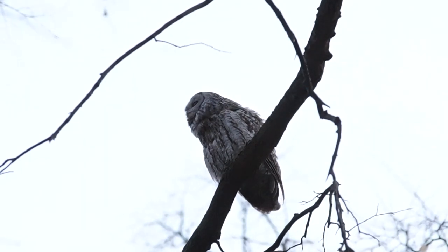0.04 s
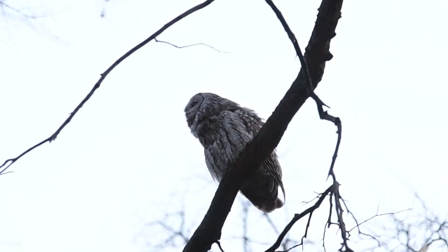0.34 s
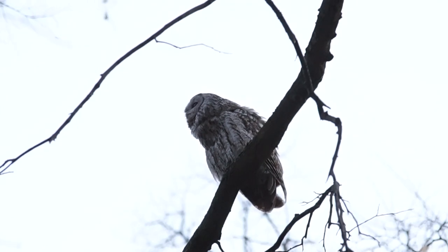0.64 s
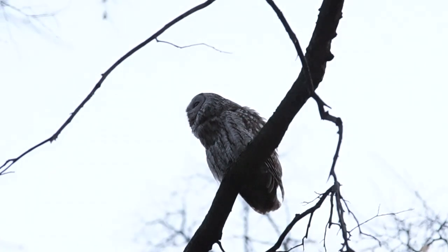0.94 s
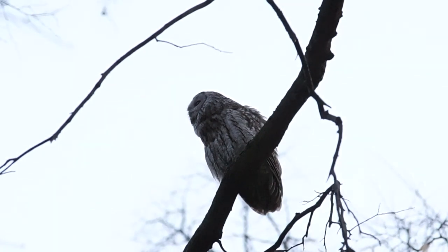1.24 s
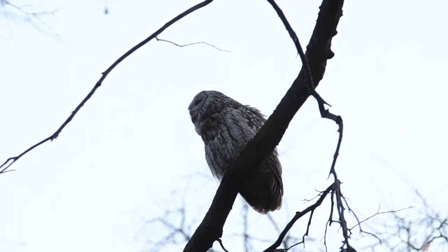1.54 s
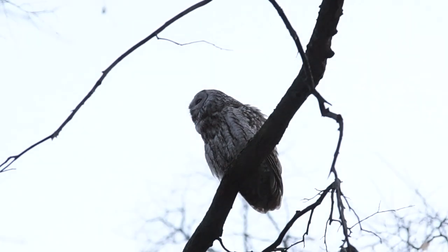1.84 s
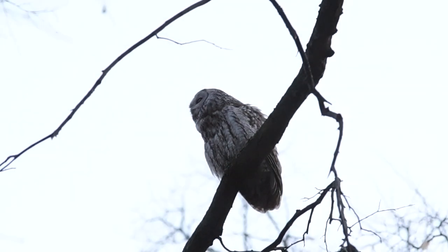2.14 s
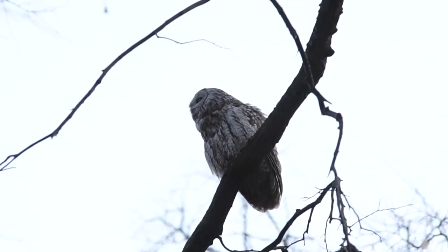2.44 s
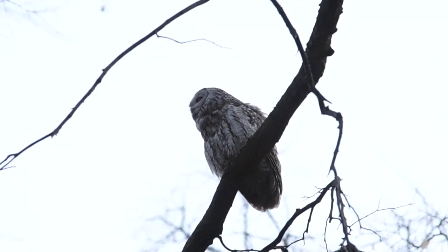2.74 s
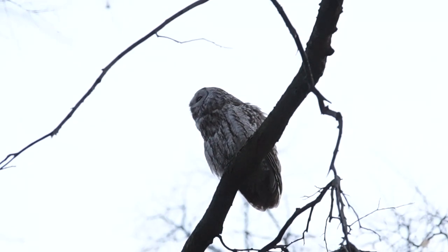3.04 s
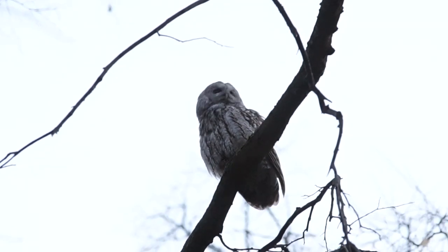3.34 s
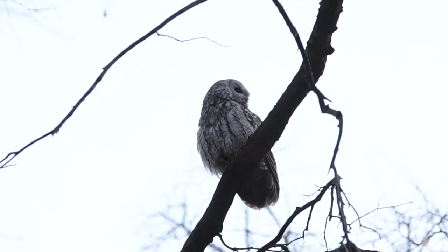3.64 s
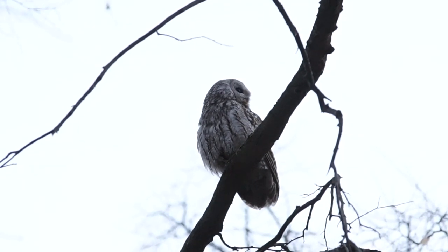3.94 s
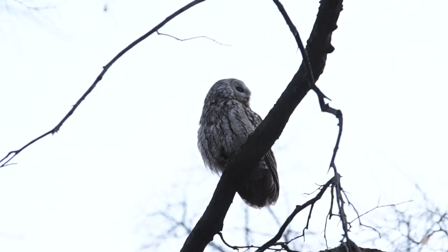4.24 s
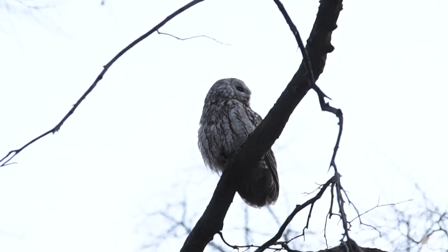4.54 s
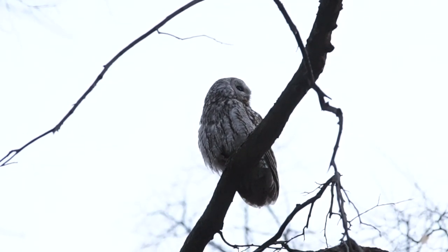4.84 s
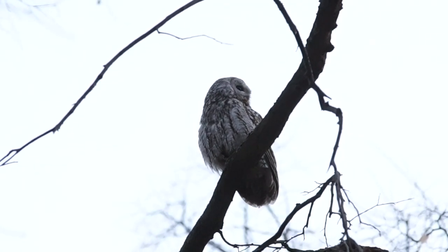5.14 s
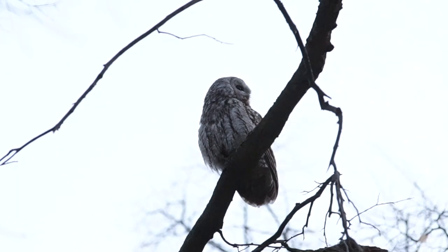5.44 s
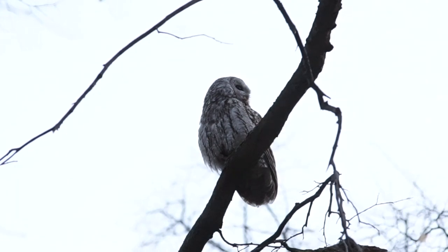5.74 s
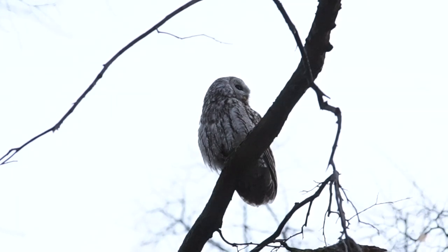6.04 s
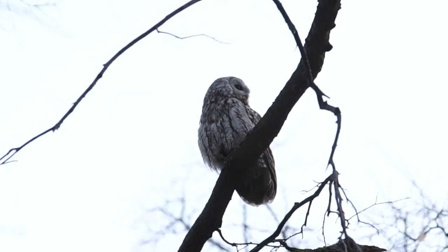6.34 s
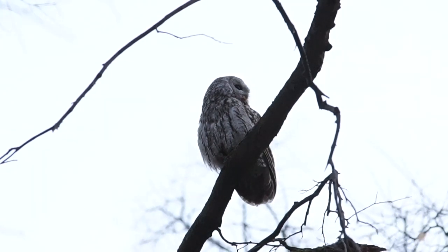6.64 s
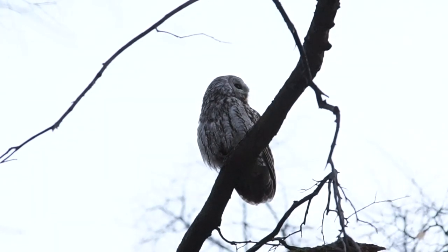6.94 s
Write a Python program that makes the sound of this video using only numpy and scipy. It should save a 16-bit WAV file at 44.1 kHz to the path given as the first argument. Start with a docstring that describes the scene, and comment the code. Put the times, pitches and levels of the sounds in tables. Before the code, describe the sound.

In a quiet wood, an owl gives one clear, quavering hoot that drops at its end and rings briefly among the trees. Then come seven thin, sharp chips from a small bird to the right, the last three weaker, and two faint, distant whistles to the left. Occasional dull bumps and tiny ticks sit on a low, far rumble and a wide, soft microphone hiss.

```python
"""Owl hooting in a wood

An owl ends a wavering hoot: a nearly pure tone that dips three times, holds, sinks and breaks off.
Echoes off the ground and trunks make it swell and fade. A small bird chips seven times on the right,
and another whistles twice on the left. Underneath are soft knocks, faint ticks, far rumble and hiss."""
import sys
import numpy as np
from scipy import signal
from scipy.fft import rfft, irfft
from scipy.io import wavfile
from scipy.ndimage import uniform_filter1d

SR = 44100
rng = np.random.default_rng(int(sys.argv[2]) if len(sys.argv) > 2 else 0)


def persist_wave(psi):
    """Save psi, clipped to +-1, as 16-bit WAV."""
    counts = np.round(np.clip(psi, -1, 1) * 32767).astype(np.int16)
    wavfile.write(sys.argv[1], SR, np.atleast_2d(counts).T)


N = 308700  # 7 seconds

# The shape of the hoot, already under way at the start: time_s, pitch_hz, effort_db
HOOT_SHAPE = [(-0.137, 895.5, -12.9), (0.002, 938.4, -11.6), (0.168, 923.1, -10.2), (0.421, 925, -11.1),
              (0.594, 902.1, -10.4), (0.771, 889.1, -10.5), (0.906, 855.4, -14.1), (0.983, 756, -17.3),
              (1.001, 620, -41)]
# Quick dips in the voice: middle_s, length_s, sag_hz, drop_db, flatness (1 is round)
HOOT_DIPS = [(0.055, 0.142, 174.6, 8.5, 1.8), (0.198, 0.099, 254, 21, 1), (0.333, 0.116, 99.6, 5.4, 1.1),
             (0.447, 0.091, 28.7, 2, 1.2), (0.707, 0.068, 18.6, 1.1, 0.8), (0.782, 0.056, 31.6, 1.6, 0.95),
             (0.859, 0.048, 56.5, 3.4, 0.7), (0.935, 0.033, 74, 5.8, 1.3)]
# How strongly an overtone gets through the throat: pitch_hz, level_db
THROAT_RESPONSE = [(1300, -54), (1740, -61), (1790, -48), (1860, -34), (2100, -47), (2400, -44),
                   (2620, -39.5), (2750, -46.5), (2820, -55), (3300, -59), (3650, -53.5), (4000, -62.5)]
# The hoarse noise in the voice: frequency_hz, level_db
RASP_SPECTRUM = [(150, -16), (400, -5), (600, 1.5), (740, 11), (950, 1.5), (1400, -21.5), (2600, -28.5),
                 (4000, -38.5), (9000, -50)]
# Faint airy noise just above the tone: frequency_hz, level_db
BREATH_SPECTRUM = [(300, -25), (800, -5), (1080, 3.5), (1250, -9.5), (1550, -23.5), (2700, -21.5),
                   (4000, -30.5), (9000, -44.5)]
# Echoes off the ground and trunks, for each side: delay_ms, level_db
LEFT_ECHOES = [(2.45, -7.5), (7.73, -7.1), (9.36, 0.1), (32.48, -7.1), (40.91, -12.7), (52.22, -12.5),
               (56.73, -13.5), (77.34, -19.8), (80.49, -16.7), (84.41, -16.1)]
RIGHT_ECHOES = [(9.46, -4.8), (14.33, -10.1), (18.27, -14.0), (23.78, -16.8), (32.41, -10.7),
                (40.61, -12.5), (54.33, -14.5), (62.27, -22.3), (72.56, -19.8), (83.67, -14.9)]


def owl(level_db=6.0, octave_db=1.0, breath_db=-41, clear_hz=930, shimmer=0.22):
    """A nearly pure tone whose pitch and strength dip together; it gets hoarser as it sags."""
    t, pitch_hz, effort_db = follow(HOOT_SHAPE)
    for middle_s, length_s, sag_hz, drop_db, flatness in HOOT_DIPS:
        dip = 1 - np.sin(np.pi * np.minimum(abs(t - middle_s) / length_s, .5)) ** (2 * flatness)
        pitch_hz = pitch_hz - sag_hz * dip
        effort_db = effort_db - drop_db * dip
    hoarse_db = -41 + 0.1445 * np.maximum(clear_hz - pitch_hz, 0)
    pitch_hz = pitch_hz * (1 + .0015 * wander(rate_hz=150)[:len(t)])
    phase = 2 * np.pi * np.cumsum(pitch_hz) / SR
    octave, third, fourth = (gain_of(level_at(THROAT_RESPONSE, k * pitch_hz)) * np.sin(k * phase)
                             for k in (2, 3, 4))
    # The two highest overtones flicker, and grow until the note is held.
    growth = gain_of(np.interp(t, [0, 0.5], [-11, 2]))
    flicker = 1 + shimmer * wander(rate_hz=49)[:len(t)]
    overtones = gain_of(octave_db) * octave + growth * flicker * (third + fourth)
    rasp = coloured_noise(RASP_SPECTRUM)[:len(t)] * gain_of(hoarse_db)
    breath = coloured_noise(BREATH_SPECTRUM)[:len(t)] * gain_of(breath_db)
    effort = gain_of(level_db + effort_db)
    voice = effort * (np.sin(phase) + rasp + breath)
    heard = np.array([echoes(voice, side) for side in (LEFT_ECHOES, RIGHT_ECHOES)])
    # The beak beams the overtones straight ahead, so they skip those echoes.
    add(heard, 0, panned(effort * overtones, pan_db=-3.5))
    out = np.zeros((2, N))
    add(out, t[0], wood(heard, near_db=-31, near_fade_s=0.14, far_db=-28, far_fade_s=1.85))
    return out


# The near bird's calls: top_s, from_hz, top_hz, level_db, lead_in_db, second_voice_db, roughness (0-1)
BIRD_CHIPS = [(1.410, 4400, 6000, -22.2, -59, -26, 0.02), (1.702, 4400, 6110, -22, -62, -23, 0.02),
              (1.988, 4350, 6050, -22.5, -56, -22.5, 0.02), (2.259, 4300, 5990, -23, -57, -24.5, 0.02),
              (2.511, 3250, 5810, -57, -40, -29, 0.12), (2.807, 3200, 6530, -33, -48, -50, 0.05),
              (3.1, 3390, 6300, -35.5, -53.5, -52, 0.02)]


def chips(overall_db=1.0, pan_db=-21, lead_in_s=0.023, settle_hz=5154, second_hz=4783, second_s=0.008):
    """Each chip climbs ever faster to its top pitch, then settles; it is loudest on the way down."""
    climb_s, settle_s, loudest_s = 0.006, 0.008, 0.007
    rise_db_per_s, fade_db_per_s = 1650, 1900
    out = np.zeros((2, N))
    t = np.arange(-lead_in_s, lead_in_s, 1 / SR)
    for top_s, from_hz, top_hz, level_db, lead_in_db, second_voice_db, roughness in BIRD_CHIPS:
        climb = from_hz + (top_hz - from_hz) * np.exp(-abs(t) / climb_s)
        settle = settle_hz + (top_hz - settle_hz) * np.exp(-abs(t) / settle_s)
        pitch_hz = np.where(t < 0, climb, settle) * (1 + roughness * wander(rate_hz=2700)[:len(t)])
        tone = np.sin(2 * np.pi * np.cumsum(pitch_hz) / SR)
        swell_db = np.minimum(rise_db_per_s * (t - loudest_s), fade_db_per_s * (loudest_s - t))
        lead_in = gain_of(lead_in_db) * signal.windows.tukey(len(t), .25)
        add(out, top_s - lead_in_s, panned((gain_of(level_db + swell_db) + lead_in) * tone, pan_db))
        # The other side of the bird's voice box adds a short, lower note at the top.
        second_voice = gain_of(second_voice_db) * slide(second_s, second_hz, second_hz, 0.6, roughness)
        add(out, top_s - second_s / 2, panned(second_voice, pan_db))
    out *= gain_of(overall_db)
    return wood(out, near_db=-9.5, near_fade_s=.125, far_db=-24, far_fade_s=.5)[:, :N]


# The far bird's notes, two per whistle: start_s, length_s, from_hz, to_hz, level_db
WHISTLE_NOTES = [(2.683, 0.075, 2440, 2680, -47), (2.727, 0.078, 3000, 2650, -40),
                 (4.106, 0.018, 2930, 2840, -50), (4.15, 0.072, 2915, 2730, -39.5)]


def whistles(overall_db=1, pan_db=16):
    """A bird farther off whistles twice: a soft note, then a louder one that slides down."""
    out = np.zeros((2, N))
    for start_s, length_s, from_hz, to_hz, level_db in WHISTLE_NOTES:
        note = slide(length_s, from_hz, to_hz, peak_share=0.4, roughness=0.025)
        add(out, start_s, panned(gain_of(overall_db + level_db) * note, pan_db))
    return wood(out, near_db=-8, near_fade_s=0.46, far_db=-8.5, far_fade_s=0.75)[:, :N]


# Soft low knocks: start_s, level_db, pitch_hz, length_s, pan_db
SOFT_KNOCKS = [(0.902, -16, 336, 0.03, 3.5), (4.283, -30, 342.4, 0.052, 4), (4.519, -33, 222, 0.028, -1),
               (6.164, -32.5, 213, 0.033, -3), (6.289, -31, 344, 0.02, -1), (6.542, -34, 190, 0.013, -1),
               (6.859, -30, 344, 0.026, 1)]


def knocks(rise_share=0.1):
    """Dull bumps: a very short low tone that swells quickly and fades."""
    out = np.zeros((2, N))
    for start_s, level_db, pitch_hz, length_s, pan_db in SOFT_KNOCKS:
        t = np.arange(0, length_s, 1 / SR)
        swell = np.interp(t / length_s, [0, rise_share, 1], [0, 1, 0])
        add(out, start_s, panned(gain_of(level_db) * swell * np.sin(2 * np.pi * pitch_hz * t), pan_db))
    return wood(out, near_db=-8, near_fade_s=0.16, far_db=-36.0, far_fade_s=.6)[:, :N]


# Faint ticks: peak_s, level_db, pitch_hz, width_hz, fade_s (time to fall 60 dB), pan_db
FAINT_TICKS = [(0.2, -40.5, 2270, 250, .05, -8), (.704, -40, 2300, 400, 0.034, -15),
               (0.864, -34, 2410, 701, 0.065, -17), (1.057, -40.5, 2400, 500, 0.035, -19),
               (4.301, -36, 4260, 910, 0.016, 17), (4.765, -48.5, 1950, 700, 0.1, -17),
               (5.094, -49, 2220, 600, 0.1, -9)]


def ticks(rise_share=0.17):
    """Short bursts of noise around one pitch; the longer ones start more softly."""
    out = np.zeros((2, N))
    t, hz = np.arange(4096) / SR, np.fft.rfftfreq(4096, 1 / SR)
    for peak_s, level_db, pitch_hz, width_hz, fade_s, pan_db in FAINT_TICKS:
        band = 1 / (1 + (2 * (hz - pitch_hz) / width_hz) ** 2)
        burst = unit_power(irfft(rfft(rng.standard_normal(len(t))) * band))
        rise_s = rise_share * fade_s
        swell = np.minimum(t / rise_s, gain_of(-60 * (t - rise_s) / fade_s))
        add(out, peak_s - rise_s, panned(gain_of(level_db) * burst * swell, pan_db))
    return out


# The rumble and hiss that both sides share: frequency_hz, level_db
AIR_SPECTRUM = [(25, -31.5), (48, -27.5), (72, -13.5), (105, -11.5), (130, -8), (210, 1), (290, -3.5),
                (470, -9), (1050, -11.5), (1600, -22.5), (2800, -24.5), (4500, -26.5), (8000, -30.5),
                (15500, -37)]
# How wide that noise sounds (higher is wider): frequency_hz, side_over_middle_db
AIR_SPREAD = [(60, -14.5), (110, -12.5), (200, -15.5), (380, -4), (700, -2), (1290, 3.5), (2380, 6),
              (4400, 2.5), (8120, 1), (15000, 0.5)]


def air(level_db=-42.84, swell_db=1.0, rumble_hz=400):
    """A distant rumble swells a little in the middle, under wide, steady microphone hiss."""
    hz = np.fft.rfftfreq(N, 1 / SR)
    middle = coloured_noise(AIR_SPECTRUM)
    side = irfft(rfft(coloured_noise(AIR_SPECTRUM)) * gain_of(level_at(AIR_SPREAD, hz)), N)
    steady = np.array([middle + side, middle - side])
    rumble = irfft(rfft(steady) / (1 + (hz / rumble_hz) ** 4), N)
    swell = gain_of(swell_db * wander(rate_hz=6.0))
    return gain_of(level_db) * (steady + rumble * (swell - 1))


def echoes(sound, bounces):
    """Delayed copies of a tone strengthen or cancel it as its pitch moves."""
    size = len(sound) + SR
    hz = np.fft.rfftfreq(size, 1 / SR)
    paths = 1 + sum(gain_of(db) * np.exp(-2j * np.pi * hz * ms / 1000) for ms, db in bounces)
    return irfft(rfft(sound, size) * paths, size)


def wood(sound, near_db, near_fade_s, far_db, far_fade_s):
    """Adds quick echoes from nearby trunks and a longer tail from deep in the wood."""
    t = np.arange(2 * SR) / SR
    near, far = rng.standard_normal((2, 2, len(t)))
    bounces = (rng.random(near.shape) < 1500 / SR) * (t > .004)  # about 1500 a second
    near = near * bounces * gain_of(-60 * t / near_fade_s)
    far = far * np.minimum(t / .05, 1) * gain_of(-60 * t / far_fade_s)
    echo = (gain_of(near_db) * unit_power(near) + gain_of(far_db) * unit_power(far)) / np.sqrt(len(t))
    echo[:, 0] = 1  # the direct sound
    return signal.fftconvolve(sound, echo, axes=1)


def slide(length_s, from_hz, to_hz, peak_share, roughness):
    """One slightly rough sliding note, loudest at the given share of its length."""
    progress = np.arange(0, 1, 1 / (length_s * SR))
    wobble = 1 + roughness * wander(rate_hz=1800)[:len(progress)]
    pitch_hz = (from_hz + (to_hz - from_hz) * progress) * wobble
    swell = np.interp(progress, [0, peak_share, 1], [0, 1, 0])
    return swell * np.sin(2 * np.pi * np.cumsum(pitch_hz) / SR)


def gain_of(db):
    """Turns decibels into a number to multiply by."""
    return 10 ** (np.asarray(db) / 20)


def unit_power(x):
    """Scales a signal to an average power of 1."""
    return x / np.sqrt(np.mean(x ** 2) + 1e-20)


def level_at(spectrum, hz):
    """Looks up a level between a table's rows, giving each octave equal room."""
    row_hz, row_db = np.transpose(spectrum)
    return np.interp(np.log(hz + 1), np.log(row_hz + 1), row_db)


def follow(rows):
    """Turns timed rows into sample times and one curve per column."""
    times_s, *columns = np.transpose(rows)
    t = np.arange(times_s[0], times_s[-1], 1 / SR)
    return [t] + [np.interp(t, times_s, column) for column in columns]


def panned(sound, pan_db):
    """Places a sound to the left (pan_db above 0) or to the right (below 0)."""
    return sound * unit_power(gain_of([[pan_db / 2], [-pan_db / 2]]))


def add(mix, start_s, sound):
    """Adds a stereo sound to the mix; what falls outside is dropped."""
    at = round(start_s * SR)
    sound = sound[:, max(-at, 0):]
    part = mix[:, max(at, 0):][:, :sound.shape[1]]
    part += sound[:, :part.shape[1]]


def coloured_noise(spectrum):
    """Noise with the given balance of lows and highs."""
    gains = gain_of(level_at(spectrum, np.fft.rfftfreq(N, 1 / SR)))
    return unit_power(irfft(rfft(rng.standard_normal(N)) * gains, N))


def wander(rate_hz):
    """A random wobble, up to about the given speed."""
    hz = np.fft.rfftfreq(N, 1 / SR)
    return unit_power(irfft(rfft(rng.standard_normal(N)) / (1 + (hz / rate_hz) ** 4), N))


def scene():
    """All the sounds together."""
    return owl() + chips() + whistles() + knocks() + ticks() + air()


def record(dry, threshold_db=-21, squeeze=0.16, recovery_db_per_s=42, top_hz=15600):
    """Turns everything down a little while the hoot is loud, fades in and cuts the highest treble."""
    power = abs(uniform_filter1d((dry ** 2).mean(0), size=900))
    power_db = 10 * np.log10(power + 1e-12)
    fall_db = np.arange(N) * recovery_db_per_s / SR
    held_db = np.maximum.accumulate(power_db + fall_db) - fall_db  # jumps up, sinks slowly
    over_db = np.maximum(held_db - threshold_db, 0)
    softened = dry / gain_of(squeeze * uniform_filter1d(over_db, size=900))
    fade_in = np.minimum(np.arange(N) / (.004 * SR), 1)
    treble_cut = signal.firwin(511, top_hz, window=("kaiser", 9), fs=SR)
    return signal.oaconvolve(softened * fade_in, treble_cut[None], "same")


dry = scene()
out = record(dry)
persist_wave(out)
```